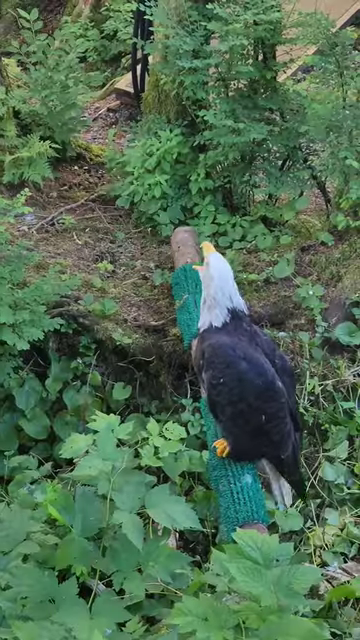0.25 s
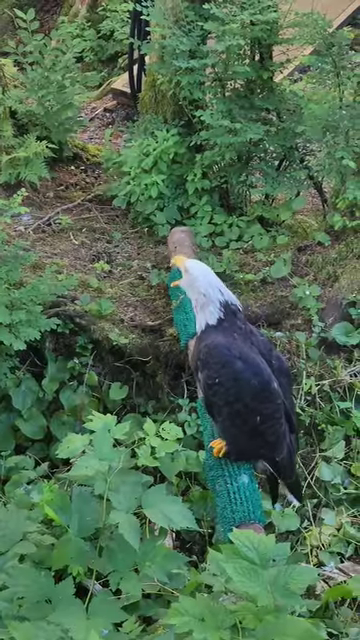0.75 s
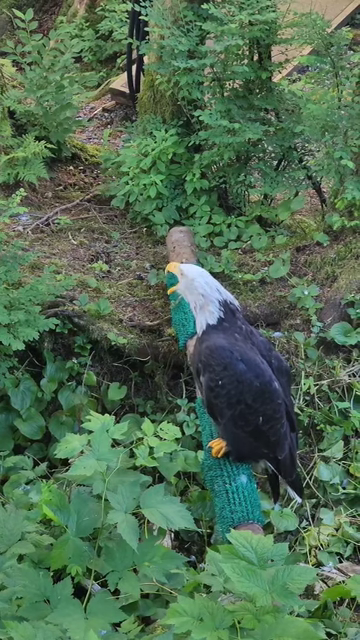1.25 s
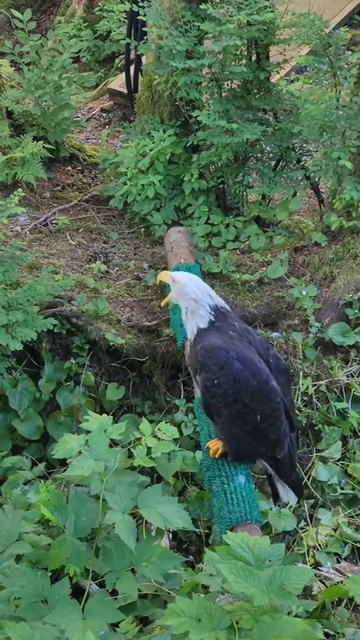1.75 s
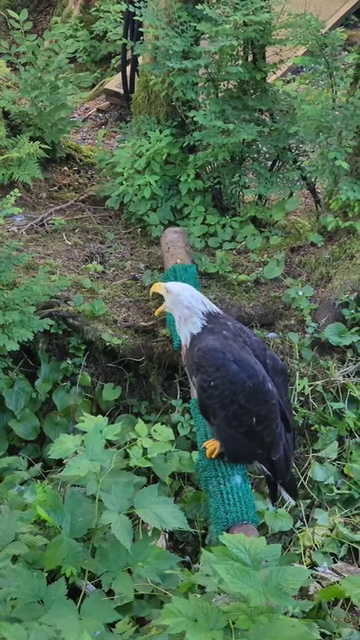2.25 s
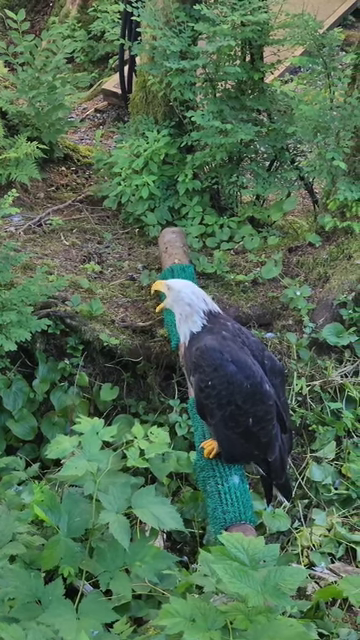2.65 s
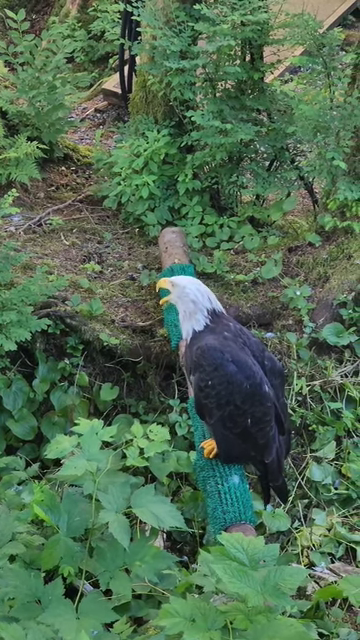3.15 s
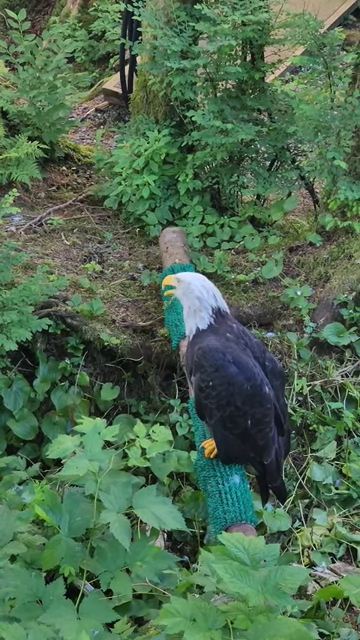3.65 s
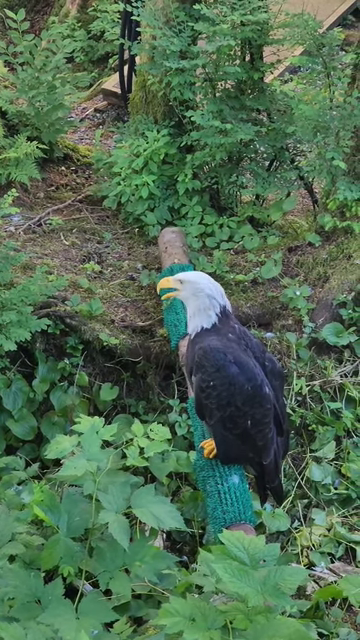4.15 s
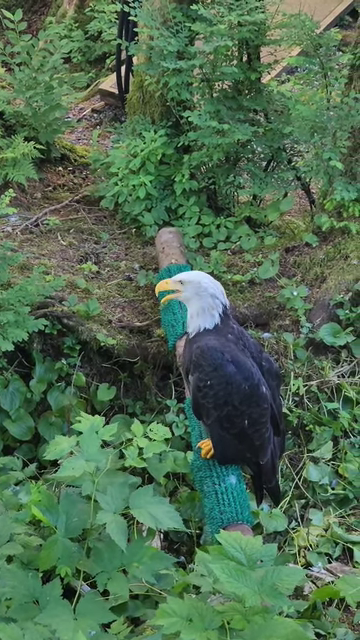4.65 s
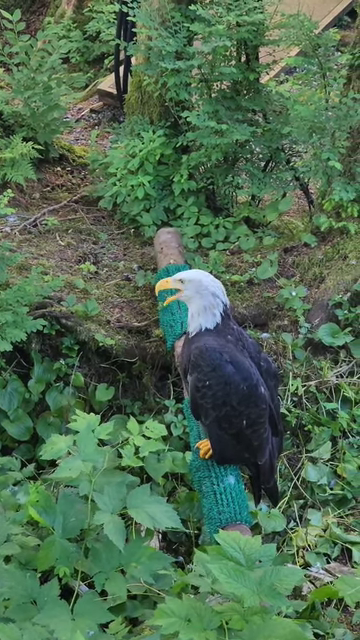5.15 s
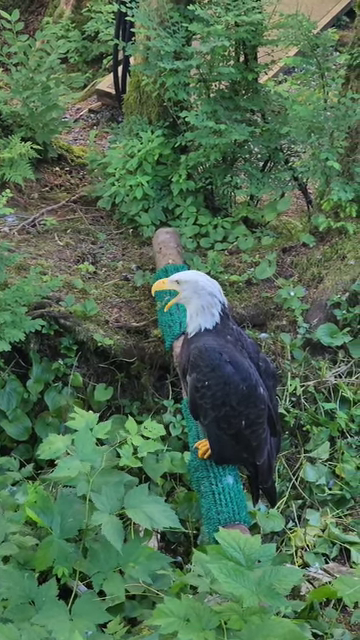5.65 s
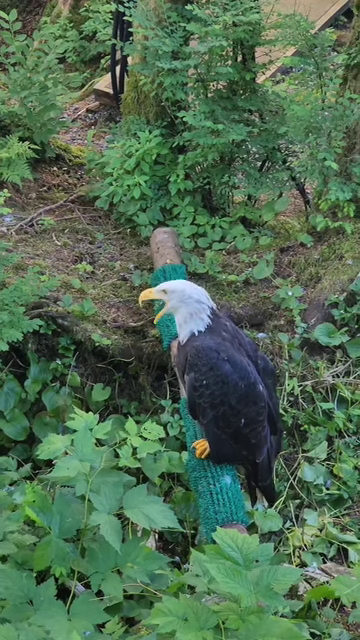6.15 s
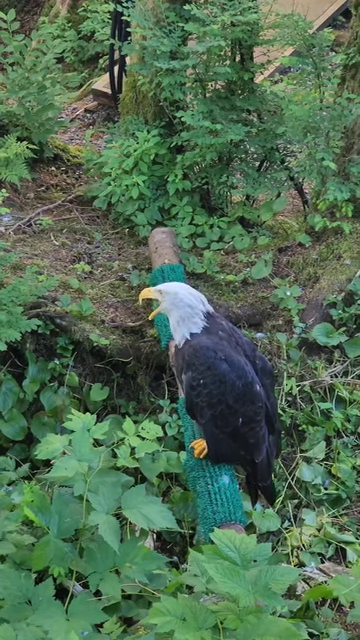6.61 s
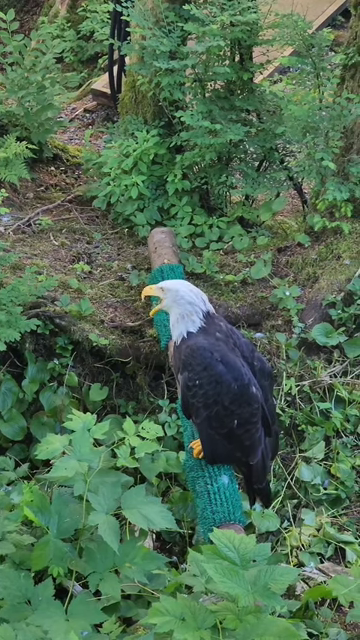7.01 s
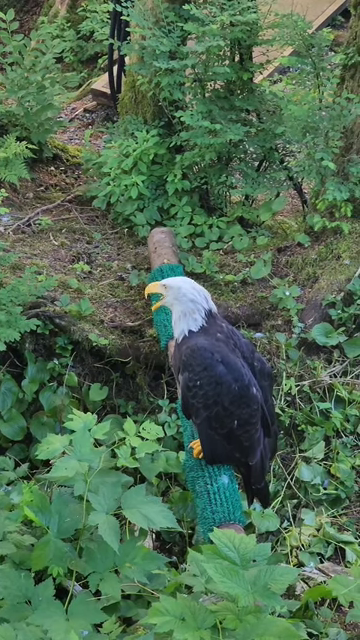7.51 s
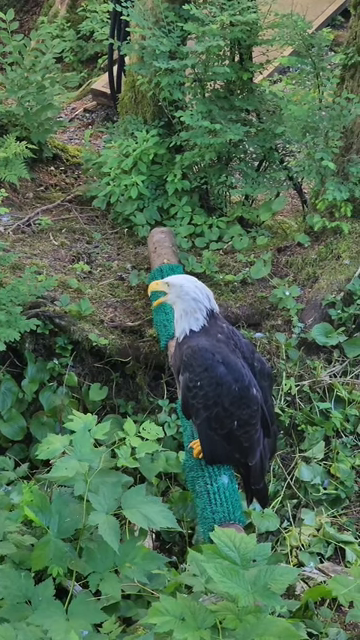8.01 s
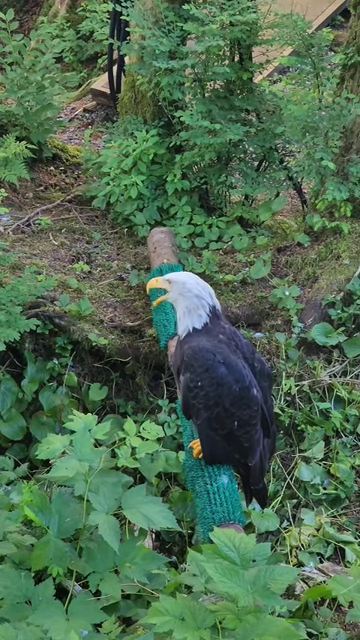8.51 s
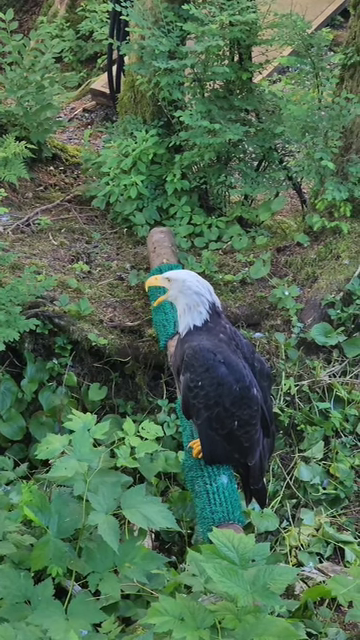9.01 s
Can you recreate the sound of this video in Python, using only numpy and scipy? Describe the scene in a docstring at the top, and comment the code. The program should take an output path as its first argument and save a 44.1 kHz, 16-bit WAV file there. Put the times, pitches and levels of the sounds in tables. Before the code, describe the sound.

A nearby bald eagle gives a few sharp yelps, then a run of high piping chirps that slow and drop in pitch. After a pause it repeats the run, louder. A second eagle, farther off, screams and whistles throughout, with hoarse squeaks as the voices break. The calls echo lightly among trees over soft outdoor noise, and a faint engine hum dies away early. The close bird sounds clear and slightly left.

```python
"""In a wooded enclosure a bald eagle chirps from a perch, and a second eagle, further off, calls with it.
Their rising yelps, screams, whistles and slowing piping notes are sine tones with bent pitch and overtones.
Hoarse squeaks, sliding tones shaken at random, mark the jumps of the voice from one register to the next.
Fading noise makes the echoes of ground and trees. A dull knock, outdoor noise and the low hum of a
distant engine that dies away complete the scene."""
import sys
import numpy as np
from scipy import signal
from scipy.fft import rfft, irfft, next_fast_len
from scipy.io import wavfile
from scipy.ndimage import uniform_filter1d, minimum_filter1d, map_coordinates

SR = 44100
rng = np.random.default_rng(int(sys.argv[2]) if len(sys.argv) > 2 else 0)


def dump(signal):
    """Clip the signal to [-1, 1] and save it as 16-bit WAV at the path in sys.argv[1]."""
    limited = np.clip(np.atleast_2d(signal).T, -1, 1)
    pcm = np.round(limited * 32767).astype(np.int16)
    wavfile.write(sys.argv[1], SR, pcm)


N = 408807
TIME = np.arange(N) / SR

# Voice levels below are set before panning and echoes. "Octave" is the tone at twice the pitch.
# Near eagle's piping notes:
# (time [s], length [s], middle pitch [Hz], level [dB], octave relative to the note [dB])
PIPING_NOTES = [(0.239, 0.028, 3713, -21.5, 4), (0.716, 0.02, 3920, -20.5, -25),
                (1.761, 0.026, 3854, -17.5, -20.5), (1.866, 0.011, 3863, -15.5, -25),
                (1.972, 0.039, 3132, -18, -9), (2.081, .046, 3175, -13.5, -6),
                (2.221, 0.051, 3048, -18, -9.5), (2.377, 0.041, 3007, -17, -12.5),
                (2.537, .045, 2322, -18.5, -8.5), (2.736, 0.018, 2136, -13.5, -13.5),
                (2.937, 0.022, 2127, -14.5, -10.5), (3.115, .042, 1740, -33.5, -23),
                (3.123, 0.01, 1304, -33.5, 1), (3.537, 0.013, 1260, -34, -0.5),
                (4.126, 0.02, 1920, -31, -27), (5.995, 0.056, 3117, -13.5, -3.5),
                (6.091, .06, 3191, -10.5, -12.5), (6.212, .054, 3260, -9, -14),
                (6.343, 0.04, 3232, -10.5, -16.5), (6.48, 0.034, 3123, -12.5, -12.5),
                (6.635, 0.044, 2464, -13.5, -9), (6.793, 0.039, 2417, -16, -6),
                (6.978, 0.027, 2228, -14.5, -14.5), (7.192, 0.035, 2178, -21, -14),
                (7.208, 0.017, 1317, -30, -13), (7.424, 0.031, 1790, -29, -17),
                (7.62, .024, 1262, -34.5, -11), (7.694, 0.025, 1440, -41, -2),
                (7.84, 0.011, 1225, -33.5, -13), (8.708, 0.012, 2103, -37, -22)]
# Near eagle's rising yelps: (time [s], length [s], top pitch [Hz], level [dB])
NEAR_YELPS = [(0.225, 0.0426, 3140, -21.5), (0.291, 0.028, 3220, -21.5), (0.659, 0.0137, 3166, -15.5),
              (1.824, 0.024, 3270, -19.5), (5.973, 0.036, 2600, -14.5)]
# Pitch of a yelp at its start, middle and end: (share of the top pitch [0-1])
YELP_ARCH_SHARES = (.84, 0.94, 1)
# The near eagle starts hoarse and clears: (time [s], roughness [0-1])
NEAR_ROUGHNESS = [(2.45, 0.39), (2.75, 0.22)]
# Far eagle's screams, each a climb of yelps, a held whistle and a break upward:
# (time [s], hold length [s], held pitch [Hz], yelp level [dB], hold level [dB], break level [dB])
FAR_SCREAMS = [(0.199, .1, 3704, -24, -22, -33), (0.624, 0.027, 3720, -25.5, -30, -44),
               (1.62, 0.017, 3730, -39.5, -29.5, -35), (2.649, .16, 3548, -32, -36.5, -40.5),
               (2.98, 0.17, 3580, -30.5, -35, -43), (3.28, .1, 3795, -30, -32, -56),
               (3.561, 0.077, 2895, -31.5, -37, -45.5), (4.509, .1, 3594, -36, -41, -44.5),
               (5.158, .105, 3776, -30, -34.5, -36.5), (5.545, 0.08, 3888, -32, -29.5, -38.5)]
# The yelps by which a scream climbs through two registers: (delay [s], length [s], top pitch [Hz])
SCREAM_CLIMB = [(0, 0.018, 2229), (0.014, 0.0306, 3100)]
# Far eagle's whistles; a catch is a brief note in the register above:
# (time [s], length [s], pitch [Hz], level [dB], catch strength relative to the whistle [0-1])
FAR_WHISTLES = [(0, 0.015, 3790, -25, 0.03), (0.502, 0.083, 3524, -32.5, 0.57),
                (0.788, 0.078, 2873, -30, 0.8), (0.94, 0.066, 2793, -32, 0.93),
                (1.097, 0.027, 2726, -27.5, 0.26), (1.294, 0.033, 2608, -33, 0.2),
                (1.637, 0.039, 3040, -36.5, 1), (1.708, 0.066, 3885, -33.5, 0),
                (2.147, 0.052, 3700, -32.5, 0.05), (2.264, 0.05, 3385, -32, 0),
                (2.836, 0.023, 3644, -27, 0.01), (3.792, 0.022, 2870, -39, 0.02),
                (3.882, 0.012, 2700, -36, 0), (4.051, .016, 2410, -37, 0.03),
                (4.577, 0.062, 4270, -43, 0.03), (4.81, 0.02, 2842, -37.5, 0.5),
                (4.94, 0.036, 2874, -40.5, 0.95), (5.057, 0.048, 2855, -36.5, 0.5),
                (5.391, 0.037, 2660, -38.5, 0.4), (6.006, .11, 4060, -33.5, 0.02),
                (7.697, 0.12, 3034, -37, 0), (7.813, 0.047, 3920, -34, 1), (7.94, 0.0683, 4052, -32, 0.85),
                (8.12, 0.076, 3968, -32.5, 0.06), (8.256, 0.044, 3900, -31.5, 0),
                (8.4, 0.061, 3102, -34.5, 0.08), (8.581, 0.068, 3010, -36.5, 0.03),
                (9.237, 0.02, 2640, -40, 0)]
# Octave of the far eagle's whistles, strongest in the lower middle: (pitch [Hz], relative level [dB])
FAR_OCTAVE_BY_PITCH = [(2400, -32), (2750, -5.5), (2900, -11), (3100, -14.5), (3700, -16), (4100, -28.5)]
# What throat and beak pass of the harmonics above the octave: (frequency [Hz], gain [dB])
THROAT_GAIN = [(4000, -8.5), (7400, 6), (8500, -6), (9400, -21.5), (10600, -20.5), (12400, -12),
               (15000, -16)]
# Lone hoarse squeaks: (time [s], length [s], start pitch [Hz], level [dB])
LONE_SQUEAKS = [(0.315, 0.13, 6230, -31), (0.655, 0.076, 6300, -29.5), (1.645, .055, 6400, -31),
                (1.7, 0.026, 7400, -27), (1.737, 0.02, 5700, -25), (1.805, 0.039, 6000, -28),
                (1.872, 0.027, 7500, -31.5), (1.935, .03, 5400, -25.5), (4.721, .13, 4910, -44)]
# Colour of the outdoor noise: (frequency [Hz], relative density [dB])
AIR_COLOUR = [(25, -14.5), (50, 1), (90, 0), (170, -4), (300, -9.5), (650, -9), (900, -6), (1150, -10),
              (1400, -10), (1800, -11.5), (3500, -18.5), (7500, -28.5), (10000, -42), (15000, -45.5)]
# How the low rumble rises and sinks: (time [s], relative level [dB])
RUMBLE_LEVEL = [(2.5, 0.5), (3.6, 3.5), (4.2, -1), (7.3, -1.5), (8.0, 2.5), (8.6, 1.5), (9.2, 2.5)]
# Distant engine: (time [s], firing rate [Hz], level [dB])
ENGINE_COURSE = [(0, 48, -41), (2.551, 49.9, -43), (2.899, 42.6, -56), (3.997, 29.5, -87.5)]

# A piping note starts and ends below its middle pitch, the more the longer it lasts (share of pitch per s)
PIPE_RISE_PER_S, PIPE_FALL_PER_S = 0.47, 2.1
YELP_OCTAVE_DB, YELP_ROUGH = -7.5, 0.44
HOLD_AFTER_S, HOLD_OCTAVE_DB, HOLD_ROUGH = 0.019, -15, .36
BREAK_GAP_S = 0.031  # pause between the held whistle and the break
BREAK_S, BREAK_OCTAVE_DB = .06, -28.5
REGISTER_RATIO = 1.275  # pitch step from one register to the next
# Second tone of the break: pitch relative to the held whistle, level relative to the break
SPLIT_RATIO, SPLIT_DB = 1.47, -6
WHISTLE_SAG, FAR_ROUGH = .022, 0.28  # share of its pitch that a whistle loses; roughness 0-1
CATCH_LEAD_S, CATCH_S = 0.0089, 0.028
ATTACK_S, RELEASE_SHARE = 0.0076, 0.32  # the release is a share of the note's length
SQUEAK_FALL = 0.15  # share of its pitch that a squeak loses
HIGH_REGISTER_HZ, QUICK_GAP_S = 2700, 0.15
ENTRY_LEAD_S, ENTRY_S, ENTRY_HZ = 0.024, 0.017, 5010
ENTRY_DB, ENTRY_DB_PER_S = -32, 194.5  # level at the slowest gap; dB per s of shorter gap
EXIT_S, EXIT_HZ, EXIT_DB = 0.022, 6420, -18  # level relative to the note
RASP_S, RASP_HZ, RASP_DB = 0.079, 6110, -6  # squeak before a scream's break; level relative to the break
NEAR_LAG_S, FAR_LAG_S = 7.2e-5, 8e-5  # how much later the right microphone port hears each bird
KNOCK_DB, KNOCK_T60_S = -33, .16  # starting level; time to fall by 60 dB
AIR_DB = -41  # rms level of the outdoor noise from 200 to 1800 Hz
CEILING, LIMITER_S, TOP_HZ = .97, .003, 15600


def near_eagle():
    """Loud, clear notes, heard mostly direct and a little earlier and louder on the left."""
    out = np.zeros((2, N))
    notes = [piping(*row) for row in PIPING_NOTES]
    notes += [yelp(*row, YELP_OCTAVE_DB) for row in NEAR_YELPS]
    for start, length, pitches, db, octave_db, rough in notes:
        note = syrinx(length, pitches, octave_db, rough, jitter=0.044, flutter=0.3, hiss_db=-8.5, upper_db=-25)
        add(out, start, undb(db) * note, pan_db=3.0)
    heard = ports(out, NEAR_LAG_S)
    return woods(heard, direct_db=3.1, tail_db=-11.5, t60=0.62, scatter_db=0.0, scatter_t60=0.07)


def piping(start, length, hz, db, octave_db):
    """One arched note, as (start, length, three pitches, level, octave level, roughness)."""
    arch = hz * (1 - length * np.array([PIPE_RISE_PER_S, 0, PIPE_FALL_PER_S]))
    rough = np.interp(start, *np.transpose(NEAR_ROUGHNESS))
    return start, length, arch, db, octave_db, rough


def yelp(start, length, top_hz, db, octave_db):
    """One rough note that swoops up to its top."""
    return start, length, top_hz * np.array(YELP_ARCH_SHARES), db, octave_db, YELP_ROUGH


def far_eagle():
    """Screams and whistles from among the trees, heard more by their echoes than directly."""
    out = np.zeros((2, N))
    calls = [scream(*row) for row in FAR_SCREAMS] + [whistle(*row) for row in FAR_WHISTLES]
    for start, length, pitches, db, octave_db, rough in sum(calls, []):
        note = syrinx(length, pitches, octave_db, rough, jitter=0.062, flutter=0.62, hiss_db=-5.0, upper_db=-13)
        add(out, start, undb(db) * note, pan_db=0.5)
    heard = ports(out, FAR_LAG_S)
    return woods(heard, direct_db=1.5, tail_db=-0.5, t60=0.87, scatter_db=0, scatter_t60=0.05)


def scream(start, hold, hz, yelp_db, hold_db, break_db):
    """The voice climbs through two yelps, holds a whistle, then breaks upward and splits into two tones."""
    climb = [yelp(start + delay, length, top_hz, yelp_db, octave_db=-20)
             for delay, length, top_hz in SCREAM_CLIMB]
    held = (start + HOLD_AFTER_S, hold, sag(hz), hold_db, HOLD_OCTAVE_DB, HOLD_ROUGH)
    breaks_at = start + HOLD_AFTER_S + hold + BREAK_GAP_S
    broken = [(breaks_at, BREAK_S, sag(hz * ratio), db, BREAK_OCTAVE_DB, FAR_ROUGH)
              for ratio, db in ((REGISTER_RATIO, break_db), (SPLIT_RATIO, break_db + SPLIT_DB))]
    return climb + [held] + broken


def whistle(start, length, hz, db, catch):
    """A held note that may first catch briefly in the register above."""
    octave_db = np.interp(hz, *np.transpose(FAR_OCTAVE_BY_PITCH))
    notes = [(start, length, sag(hz), db, octave_db, FAR_ROUGH)]
    if catch > 0:
        catch_db = db + 20 * np.log10(catch)
        catch_pitches = sag(hz * REGISTER_RATIO)
        notes.append((start - CATCH_LEAD_S, CATCH_S, catch_pitches, catch_db, BREAK_OCTAVE_DB, FAR_ROUGH))
    return notes


def sag(hz):
    """Pitch at the start, middle and end of a held note that sinks slightly."""
    return hz * (1 + WHISTLE_SAG * np.array([.5, 0, -.5]))


def squeaks():
    """Between clear notes the membrane swings irregularly: a hoarse, sliding band."""
    out = np.zeros((2, N))
    for start, length, first_hz, db in list(LONE_SQUEAKS) + voice_breaks():
        count = int(length * SR)
        slide = np.linspace(1, 1 - SQUEAK_FALL, count)
        hz = first_hz * slide * (1 + 0.075 * wobble(count, 2200))
        phase = 2 * np.pi * np.cumsum(hz) / SR
        octave = undb(-25) * np.sin(2 * phase)
        voice = np.tanh(wobble(count, 1210)) * (np.sin(phase) + octave)
        add(out, start, undb(db) * swell(count) * voice, pan_db=1.5)
    return woods(out, direct_db=0.5, tail_db=-4.5, t60=0.93, scatter_db=1.0, scatter_t60=0.087)


def voice_breaks():
    """Squeaks where the voice changes register: in screams, and into and out of high piping notes."""
    rows = [(start + HOLD_AFTER_S + hold, RASP_S, RASP_HZ, db + RASP_DB)
            for start, hold, *_, db in FAR_SCREAMS]
    gaps = np.diff([row[0] for row in PIPING_NOTES], prepend=-np.inf)
    for gap, (start, length, hz, db, _) in zip(gaps, PIPING_NOTES):
        if hz > HIGH_REGISTER_HZ:
            rows.append((start + length - EXIT_S / 2, EXIT_S, EXIT_HZ, db + EXIT_DB))
            # notes in quick succession also begin with a squeak, weaker as the rhythm slows
            if gap < QUICK_GAP_S:
                entry_db = ENTRY_DB + ENTRY_DB_PER_S * (QUICK_GAP_S - gap)
                rows.append((start - ENTRY_LEAD_S, ENTRY_S, ENTRY_HZ, entry_db))
    return rows


def syrinx(length, pitches, octave_db, rough, jitter, flutter, hiss_db, upper_db):
    """One note: a membrane whistles along an arch of pitch; roughness shakes its rate and its swing."""
    count = int(length * SR)
    arch = np.polyfit([0, .5, 1], pitches, 2)
    hz = np.polyval(arch, np.linspace(0, 1, count))
    shake = wobble(count, 573.0)
    phase = 2 * np.pi * np.cumsum(hz * (1 + rough * jitter * shake)) / SR
    pressure = swell(count)
    tone = np.sin(phase) + undb(octave_db) * pressure * np.sin(2 * phase)
    # the upper harmonics grow with the octave and need full pressure
    for k in range(3, 6):
        throat_db = np.interp(k * hz, *np.transpose(THROAT_GAIN))
        tone += undb(upper_db + throat_db + octave_db / 2) * pressure ** 2 * np.sin(k * phase)
    # in rough notes strong and weak cycles alternate, which adds a line halfway to the octave
    tone += rough ** 2 * undb(-13.5) * np.sin(3 * phase / 2)
    # a slower, unsteady vibration of the membrane puts sidebands round the whistle
    buzz_hz = 540 * (1 + 0.25 * wobble(count, 400))
    buzz = np.sin(2 * np.pi * np.cumsum(buzz_hz) / SR)
    tone *= 1 + rough * (flutter * buzz + .5 * wobble(count, 272))
    # the edges of a note, at low pressure, are hoarser than its middle
    hiss = unit(band(rng.standard_normal(SR // 2), 2900, 6000, order=3))[:count]
    breath = rough * undb(hiss_db - 10.2 * pressure) * hiss
    return pressure * (tone + breath)


def swell(count):
    """Pressure over one note: it builds, holds if the note is long enough, and lets go."""
    u = np.linspace(0, 1, count)
    attack = min(ATTACK_S * SR / count, .5)
    rise = np.minimum(u / attack, 1)
    fall = np.minimum((1 - u) / RELEASE_SHARE, 1)
    return np.sin(np.pi / 2 * rise) * np.sin(np.pi / 2 * fall) ** 2


def ports(pair, lag_s):
    """Sound reaches the left microphone port first and the right one a moment later."""
    size = next_fast_len(N)
    hz = np.arange(size // 2 + 1) * SR / size
    # turning the phase in step with frequency delays by less than a sample if need be
    right = irfft(rfft(pair[1], size) * np.exp(-2j * np.pi * hz * lag_s), size)[:N]
    return np.array([pair[0], right])


def woods(dry, direct_db, tail_db, t60, scatter_db, scatter_t60):
    """Direct sound, a quick scatter from ground and leaves, and a tail from trunks and slope."""
    t = TIME[:SR]
    noise = band(rng.standard_normal((2, 2, SR)), 530, 14200, order=1)
    response = np.zeros((2, SR))
    response[:, 0] = undb(direct_db)
    settings = ((scatter_db, scatter_t60, .004), (tail_db, t60, .022))
    for echoes, (db, decay, delay) in zip(noise, settings):
        dull = band(echoes, 660, 4400, order=1)
        # leaves soak up the treble first
        echoes = dull + (echoes - dull) * undb(-25 * t)
        echoes = echoes * undb(-60 * t / decay) * (t > delay)
        response += undb(db) * echoes / np.sqrt(np.sum(echoes ** 2) / 2)
    return signal.fftconvolve(dry, response, axes=1)[:, :N]


def knock(start, db, t60):
    """One soft, dull knock: low-pitched noise that dies away quickly."""
    t = TIME[:SR // 4]
    thud = unit(band(rng.standard_normal(len(t)), 150, 690)) * undb(db - 60 * t / t60)
    out = np.zeros((2, N))
    add(out, start, thud)
    return out


def outdoors():
    """Far-off noise, most alike in both channels in the bass, over a slowly heaving rumble."""
    hz = np.maximum(np.arange(N // 2 + 1) * SR / N, 1)
    points, db = np.transpose(AIR_COLOUR)
    colour = undb(np.interp(np.log(hz), np.log(points), db))
    likeness = np.clip(0.85 / (1 + (hz / 700) ** 2), 0, np.sqrt(3) / 2)
    # what the channels share, and what differs between them
    mid, side = rfft(rng.standard_normal((2, N))) * colour
    spectrum = mid * np.sqrt(1 + likeness) + np.array([[1], [-1]]) * side * np.sqrt(1 - likeness)
    bass = 1 / (1 + (hz / 190) ** 4)
    low, high = irfft(spectrum * bass, N), irfft(spectrum * (1 - bass), N)
    heave_db = np.interp(TIME, *np.transpose(RUMBLE_LEVEL)) + 1.8 * wobble(N, 4.9)
    air = low * undb(heave_db) + high * undb(0.25 * wobble(N, 2.58))
    return air * undb(AIR_DB) / np.std(band(air, 200, 1800))


def engine():
    """A distant idling engine: an unsteady hum at its firing rate that slows and dies away."""
    times, rates, levels = np.transpose(ENGINE_COURSE)
    hz, db = np.interp(TIME, times, rates), np.interp(TIME, times, levels)
    phase = 2 * np.pi * np.cumsum(hz * (1 + 0.01 * wobble(N, 7.1))) / SR
    hum = unit(np.sin(phase) + undb(-10.5) * np.sin(2 * phase))
    return undb(db + 1.5 * wobble(N, 8.3)) * hum


def undb(db):
    """Decibels to gain."""
    return 10 ** (np.asarray(db) / 20)


def unit(x):
    """Scale to rms 1."""
    return x / np.sqrt(np.mean(x ** 2))


def band(x, lo_hz, hi_hz, order=2):
    """Butterworth band-pass: keep what lies between two frequencies."""
    edges = [lo_hz, min(hi_hz, SR / 2 - 100)]
    return signal.sosfilt(signal.butter(order, edges, "band", fs=SR, output="sos"), x)


def wobble(count, rate_hz):
    """Smooth random drift of spread about 1, through rate_hz random points a second."""
    steps = rng.standard_normal(2048)
    return map_coordinates(steps, [np.arange(count) * rate_hz / SR], order=3, mode="grid-wrap")


def add(out, start, sound, pan_db=0):
    """Mix a sound into both channels at its time; a positive pan makes the left louder."""
    i = max(int(start * SR), 0)
    part = sound[:N - i]
    out[:, i:i + len(part)] += undb([[pan_db / 2], [-pan_db / 2]]) * part


def scene():
    """Both birds over the background."""
    birds = near_eagle() + far_eagle() + squeaks()
    background = knock(start=3.432, db=KNOCK_DB, t60=KNOCK_T60_S) + outdoors() + engine()
    return birds + background


def record(dry):
    """The recorder's limiter ducks peaks above the ceiling; then a steep filter cuts the top."""
    size = int(LIMITER_S * SR)
    needed = CEILING / np.maximum(np.abs(dry).max(axis=0), CEILING)
    # hold the lowest gain around each peak, then smooth its edges
    gain = uniform_filter1d(minimum_filter1d(needed, 2 * size), size)
    return signal.sosfilt(signal.ellip(12, .2, 80, TOP_HZ, fs=SR, output="sos"), dry * gain)


dry = scene()
out = record(dry)
dump(out)
```